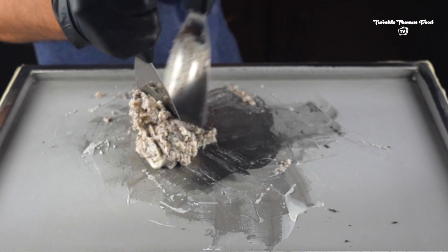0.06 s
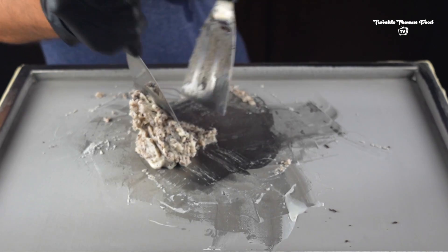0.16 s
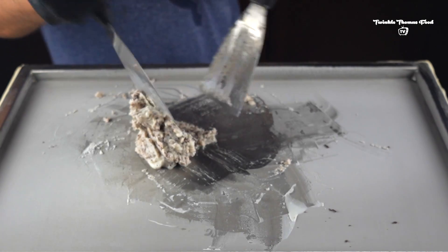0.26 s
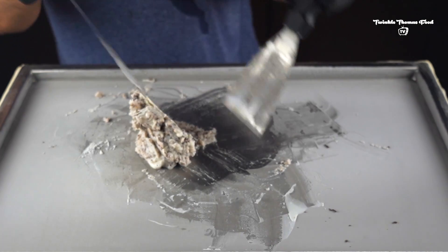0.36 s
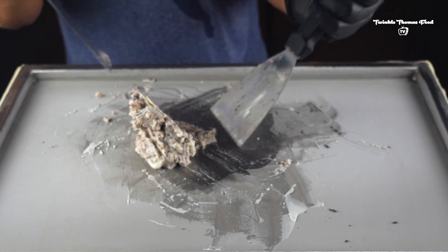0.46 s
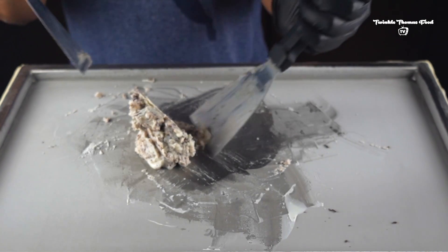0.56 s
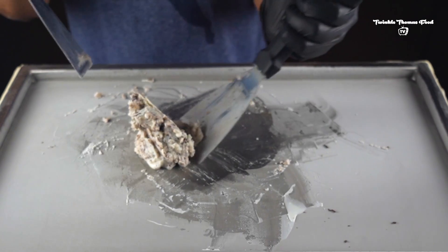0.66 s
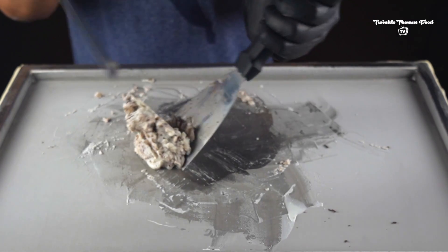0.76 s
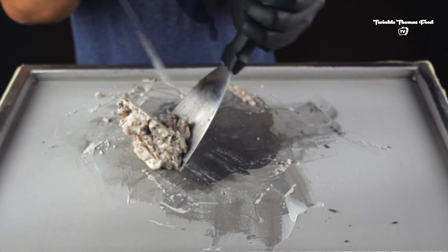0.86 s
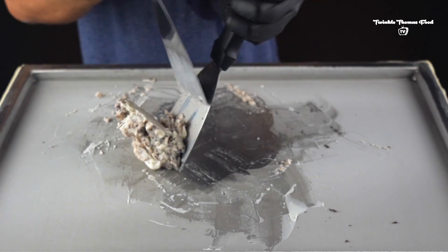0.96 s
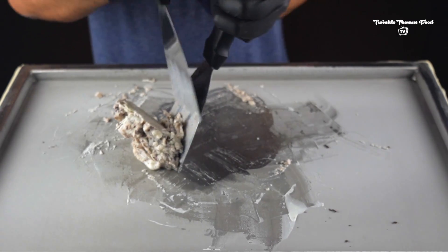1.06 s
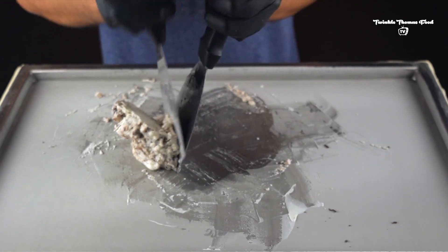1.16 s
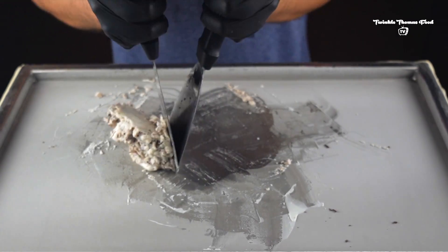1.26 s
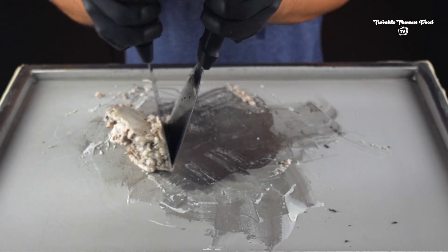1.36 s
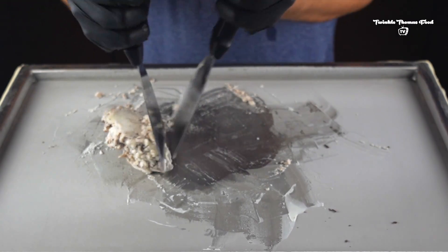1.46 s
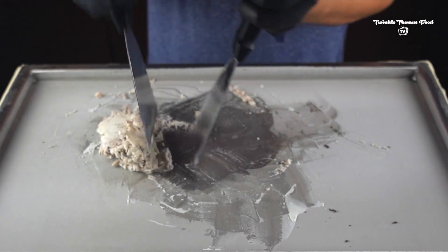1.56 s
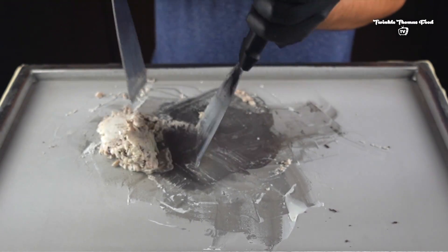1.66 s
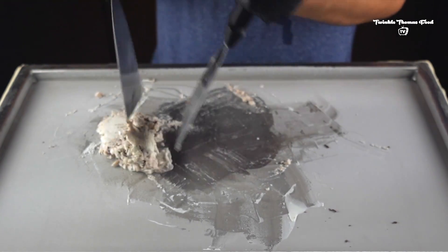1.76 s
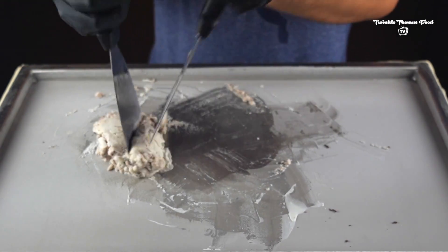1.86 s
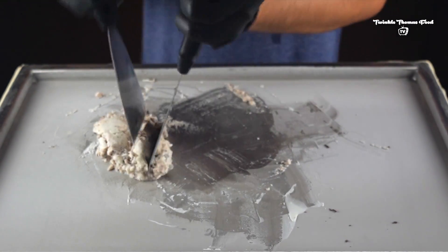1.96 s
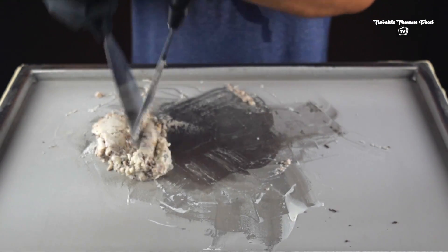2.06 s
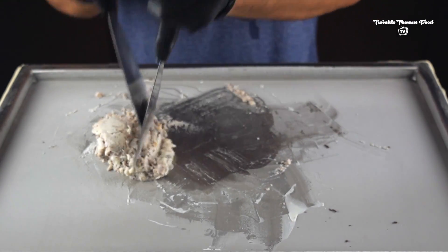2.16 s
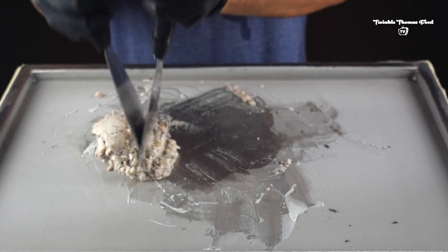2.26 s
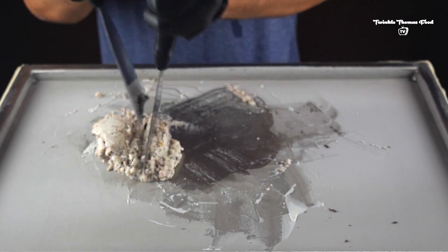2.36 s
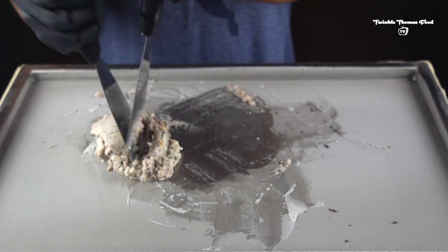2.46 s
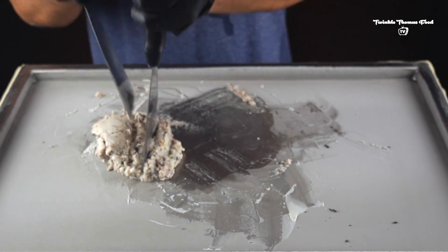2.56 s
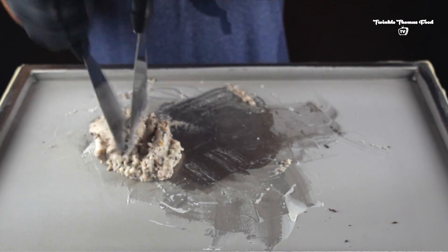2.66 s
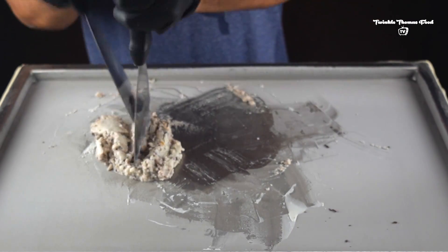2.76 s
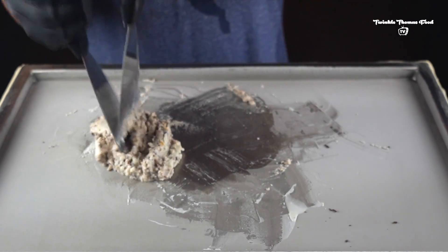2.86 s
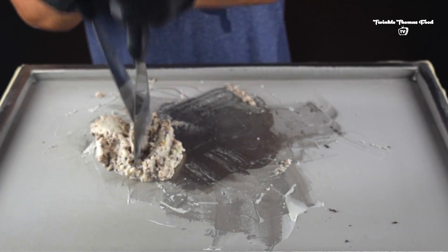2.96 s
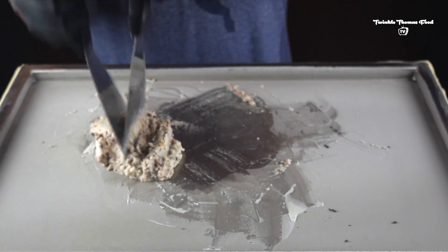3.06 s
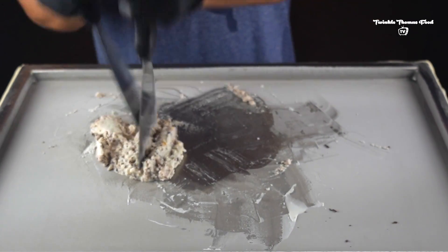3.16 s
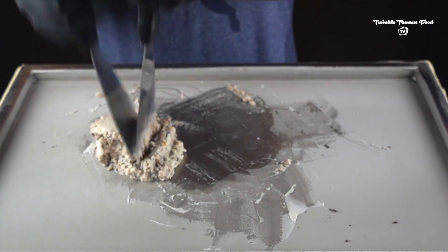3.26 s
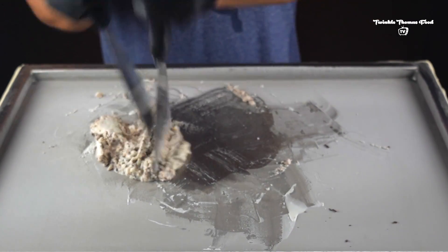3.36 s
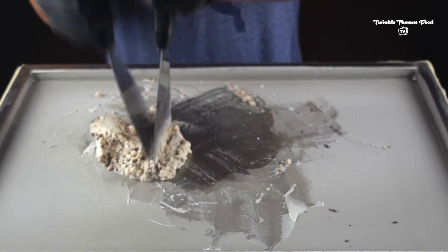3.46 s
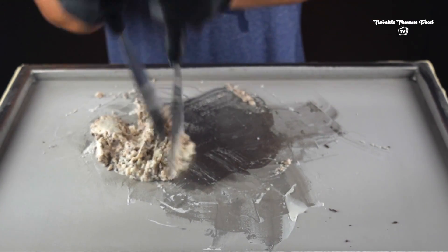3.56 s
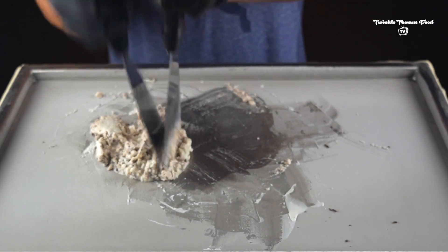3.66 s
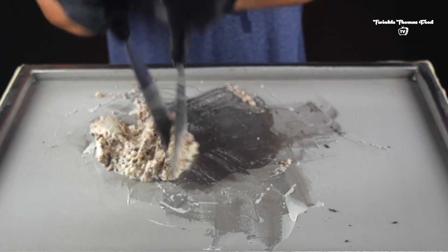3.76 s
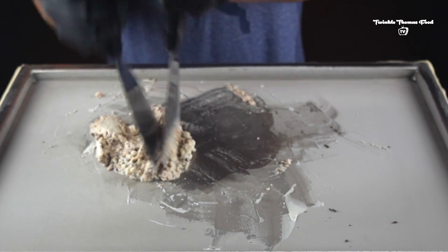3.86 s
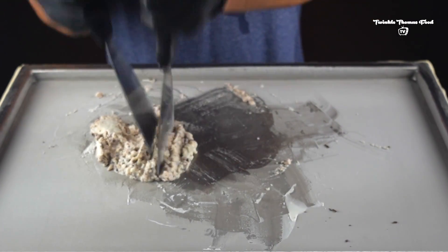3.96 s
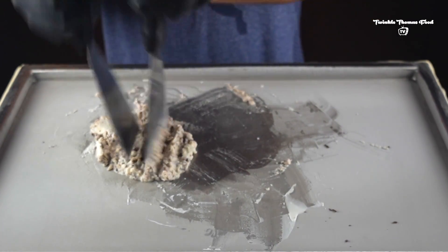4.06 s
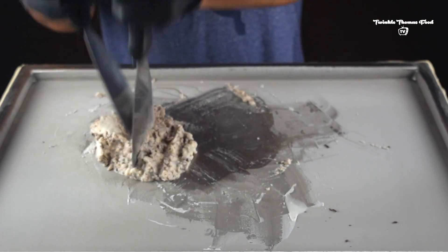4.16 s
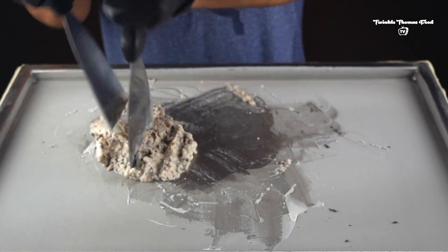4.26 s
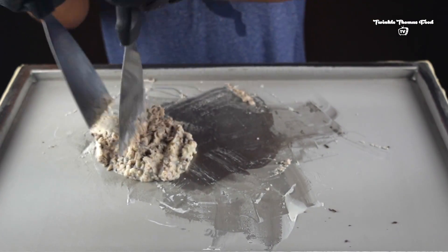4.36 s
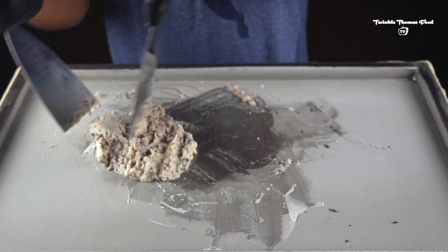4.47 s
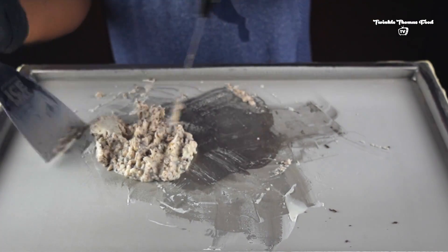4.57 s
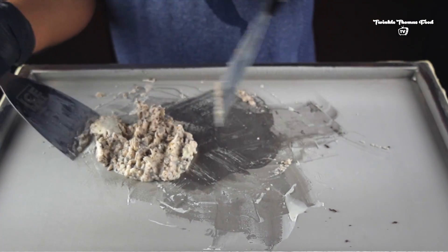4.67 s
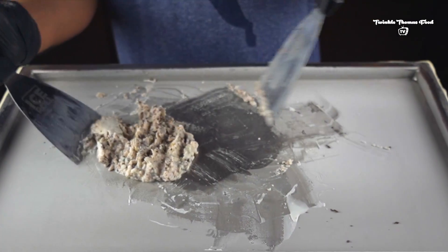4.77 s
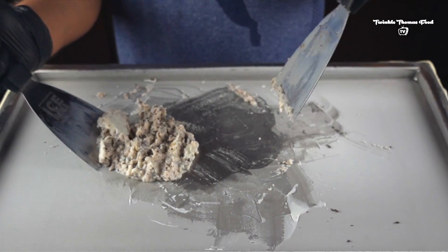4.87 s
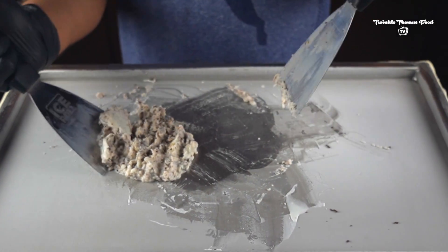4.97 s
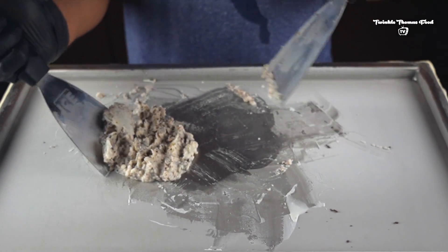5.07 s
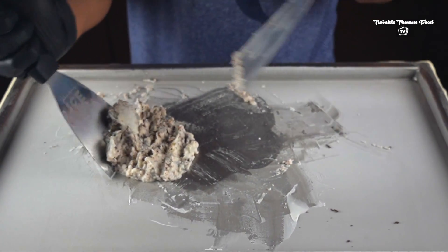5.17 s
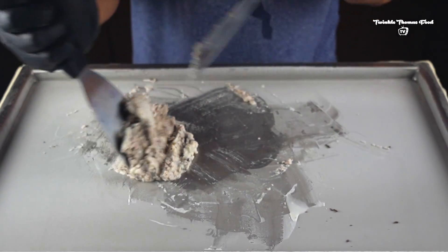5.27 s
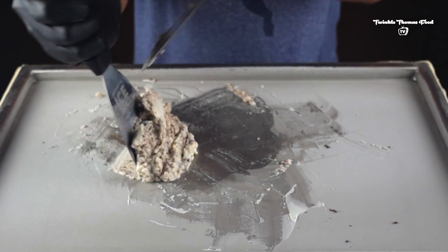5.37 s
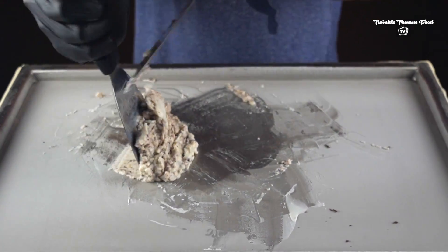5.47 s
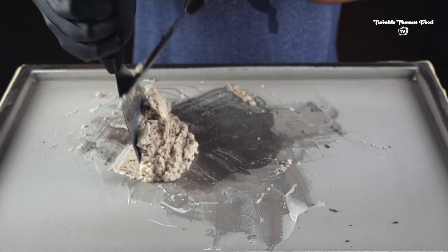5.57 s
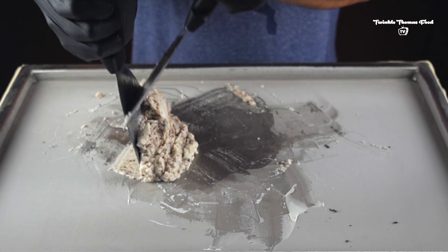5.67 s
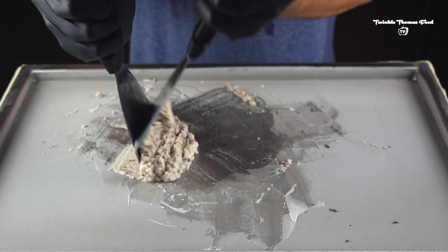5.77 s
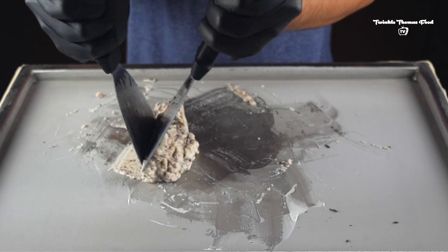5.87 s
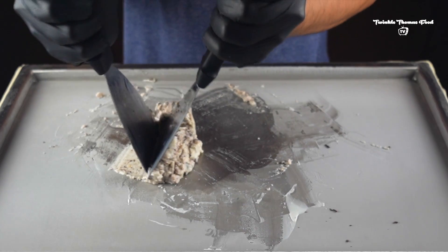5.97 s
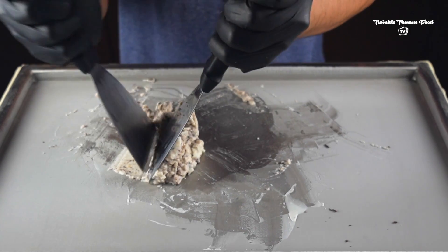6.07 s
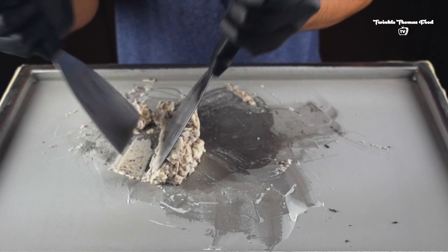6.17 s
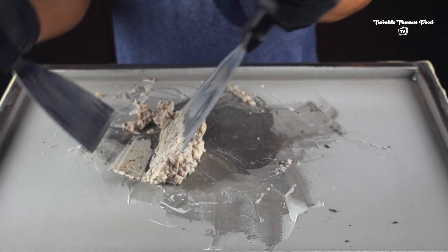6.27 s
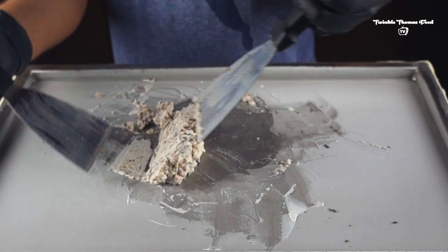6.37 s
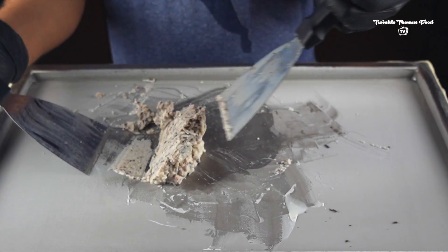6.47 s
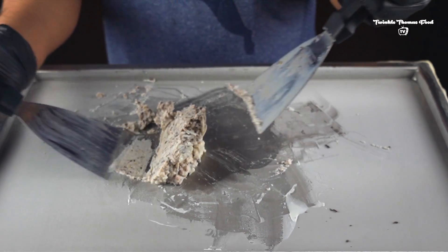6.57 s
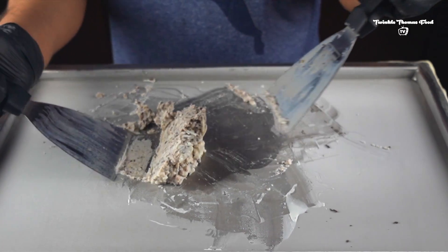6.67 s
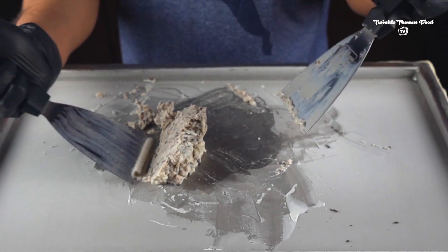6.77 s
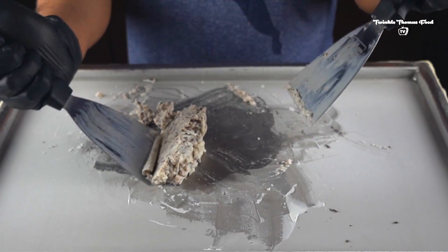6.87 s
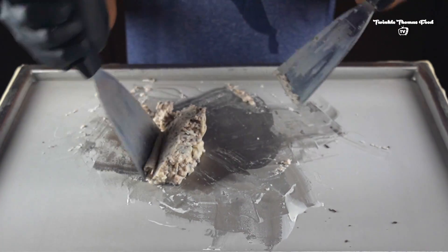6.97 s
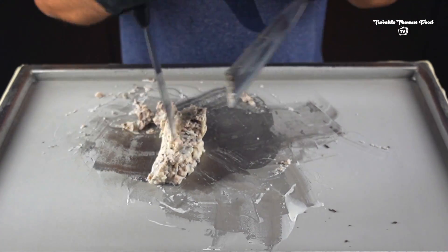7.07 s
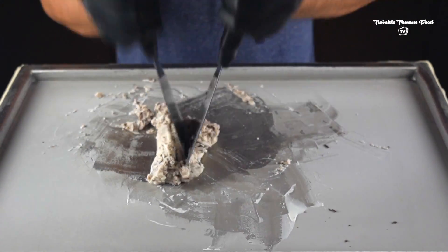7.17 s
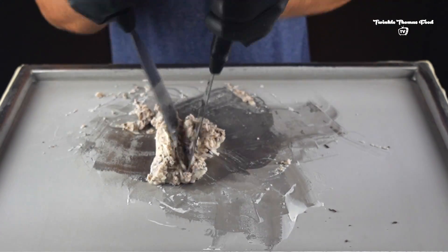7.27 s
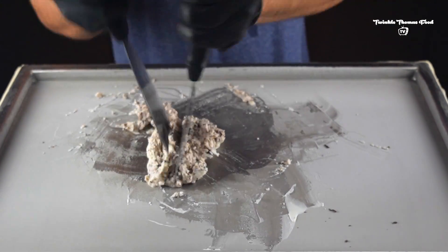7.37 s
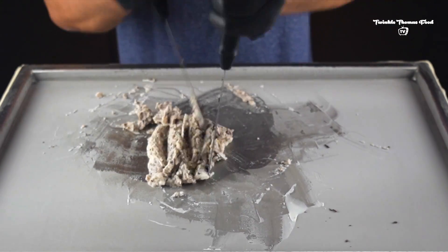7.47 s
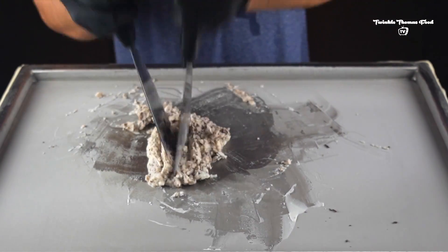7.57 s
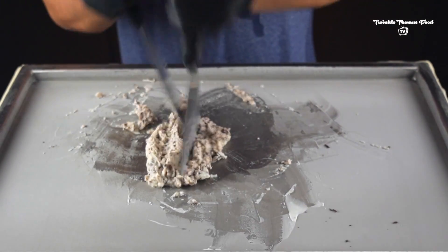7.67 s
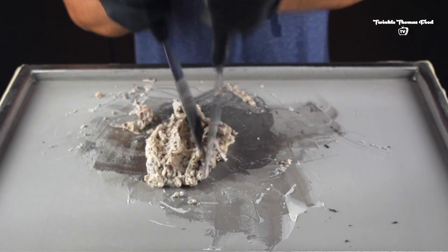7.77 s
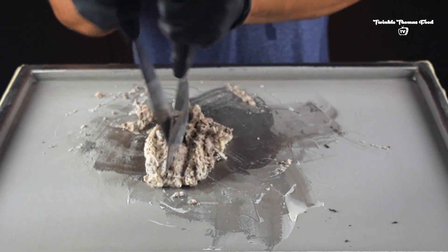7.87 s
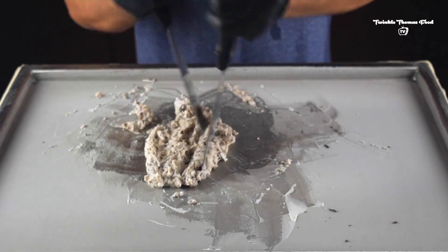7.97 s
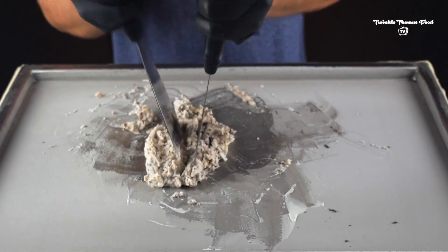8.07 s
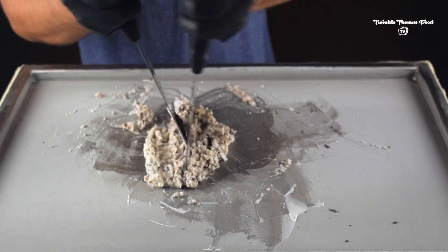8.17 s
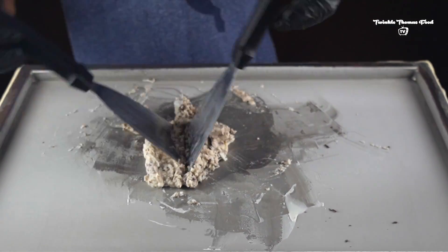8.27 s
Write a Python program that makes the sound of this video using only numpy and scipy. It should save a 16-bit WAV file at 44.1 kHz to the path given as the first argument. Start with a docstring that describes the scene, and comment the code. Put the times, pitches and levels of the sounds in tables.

```python
"""Two steel spatulas chop frozen cream on a refrigerated steel plate in a small hard kitchen.
Each chop is an impulse that excites resonances: crack, knock, blade ring, plate modes and a low thump.
Between chops the blades scuff each other (bursts of filtered noise), slide over the frost or ring on after
a tap (friction noise with a wavering squeal). Decaying octave bands of noise make the room; below it all
lies the chiller, as shaped noise for the air and narrow resonances for the drones."""
import sys
import numpy as np
from scipy import signal
from scipy.fft import rfft, irfft, next_fast_len
from scipy.io import wavfile
from scipy.ndimage import uniform_filter1d

SR = 44100
rng = np.random.default_rng(int(sys.argv[2]) if len(sys.argv) > 2 else 0)


def put_to_file(sound):
    """Save the sound as 16-bit audio at rate SR, in the file named by the first command-line argument."""
    columns = np.atleast_2d(sound).T  # one column per channel
    safe = np.clip(columns, -1, 1)
    whole_steps = np.round(safe * 32767)
    wavfile.write(sys.argv[1], SR, whole_steps.astype(np.int16))


N = 367339
MIRROR = np.array([[1], [-1]])  # opposite signs on left and right


def undb(db):
    """Decibel law: amplitude ratio of a level."""
    return 10 ** (np.asarray(db) / 20)


def unit(x):
    """Normalization to an RMS of one."""
    return x / np.sqrt(np.mean(x ** 2))


def curve(table, hz):
    """Interpolation of (Hz, value) points on a logarithmic frequency axis."""
    point_hz, value = np.transpose(table)
    return np.interp(np.log(np.maximum(hz, 1)), np.log(point_hz), value)


def resonate(x, peaks):
    """Parallel resonance: a sum of band-passes given as (Hz, width Hz, dB)."""
    out = 0
    for hz, width_hz, db in peaks:
        b, a = signal.iirpeak(hz, hz / width_hz, SR)
        out = out + undb(db) * signal.lfilter(b, a, x)
    return out


def band(x, lo_hz, hi_hz):
    """Band limitation by a Butterworth filter, its top edge kept below the Nyquist limit."""
    top_hz = min(hi_hz, .45 * SR)
    return signal.sosfilt(signal.butter(2, [lo_hz, top_hz], "band", fs=SR, output="sos"), x)


def walk(rate_hz):
    """Random modulation: normal levels drawn rate_hz times a second and joined by slopes."""
    hold = int(SR / rate_hz)
    steps = np.repeat(rng.standard_normal(N // hold + 1), hold)
    return uniform_filter1d(steps, hold)[:N]


def panned(x, left_minus_right_db):
    """Interaural level difference, split evenly between the two sides."""
    return x * undb(MIRROR * left_minus_right_db / 2)


def add(out, start_s, x):
    """Superposition of a sound onto the scene from its start time."""
    i = int(start_s * SR)
    out[:, i:i + x.shape[1]] += x[:, :N - i]


def ring(starts, gain, modes, scatter_db, detune=0, phase=0, rise_s=1 / SR):
    """Modal synthesis: struck decaying sines, weighted and optionally tuned anew at every blow."""
    hz, db, t60, late_s = np.transpose(modes)[:, :, None]
    t = np.maximum(np.arange(SR // 2) / SR - late_s, 0)
    attack = 1 - np.exp(-t / rise_s)
    closing = np.cos(np.linspace(0, np.pi / 2, SR // 2)) ** .5  # silent after half a second
    fade = undb(db - 60 * t / t60) * attack * closing
    turns = 2 * np.pi * hz * t
    sines = np.sin(turns + phase) * fade
    chance = rng.standard_normal((len(starts), 2, len(modes)))
    weights = gain * undb(scatter_db * chance[:, 0])
    shifts = chance[:, 1, :, None]
    out = np.zeros((1, N))
    for start_s, weight, shift in zip(starts, weights, shifts):
        tuned = np.sin(turns * (1 + detune * shift) + phase) * fade if detune else sines
        add(out, start_s, (weight @ tuned)[None])
    return out


# edge meets plate: start_s, crack_peak_db, thump_db, upper_ring_db, edge_brightness_db, upper_ring_hz,
# knock_db, then six levels, one per clank mode (db)
CHOP_EVENTS = [(0.3854, -35, -44, -23.5, -24.5, 3570, -39, -36.5, -51, -63, -68, -35, -54),
               (0.9265, -37, -62, -26, -23.5, 3760, -37.5, -56, -34.5, -47, -56, -46, -48),
               (0.9674, -64.0, -54, -43.0, -36.0, 3760, -73, -55, -60, -50, -65, -61, -68),
               (1.1245, -85, -54, -46, -43.0, 3350, -75, -63, -65, -71, -75, -64, -69),
               (1.173, -65, -48, -47, -43.0, 3370, -69, -65, -75, -64, -74, -67, -80),
               (1.2068, -25, -43, -24.5, -31, 2820, -26, -33, -26, -30, -30.5, -60, -36),
               (1.404, -62.0, -70, -40, -39.5, 3580, -67, -55, -59, -59, -62, -56, -59),
               (1.942, -39, -42.5, -39.5, -49.0, 3320, -38, -49, -49, -44, -56, -50, -70),
               (2.0039, -19.5, -37, -20, -27.5, 2800, -23, -30, -32, -29, -35, -43, -39),
               (2.22, -17.5, -34, -22.5, -24.5, 2750, -25, -33, -27.5, -30, -31, -49, -46),
               (2.255, -27.5, -40, -30, -29.0, 2750, -29.5, -38.5, -34, -49, -52, -61, -57),
               (2.451, -16.5, -33.5, -20.5, -25.5, 2750, -23.5, -34, -29, -39, -33, -39, -42),
               (2.539, -21, -39, -19, -28.5, 3230, -24.5, -37, -27, -35, -35, -37, -48),
               (2.6686, -18.5, -36, -21, -25, 3250, -22.5, -46, -30.5, -30, -41, -38, -42),
               (2.7596, -22, -38, -20.5, -30, 2780, -29, -31, -21, -39, -34, -44, -52),
               (2.8671, -18.5, -37, -19.5, -24.5, 3250, -25, -47, -32.5, -44, -41, -41, -55),
               (2.9737, -20, -40.5, -22.5, -25.5, 2700, -26.5, -29, -28, -40, -39, -50, -46),
               (3.075, -18.5, -35, -22, -24.5, 3350, -24, -40, -26, -31, -41, -39, -54),
               (3.1795, -35, -45, -37, -34.5, 3000, -32, -35, -39, -35, -57, -59, -55),
               (3.279, -19.5, -34, -23.5, -25, 3540, -24, -38, -28, -33, -46, -49, -44),
               (3.3793, -20.5, -51, -18.5, -25.5, 3120, -27, -40, -24, -43, -30, -33, -58),
               (3.4783, -20, -34, -26.5, -28.0, 3220, -25, -30.5, -39, -26, -51, -47, -38),
               (3.5778, -22, -44, -17, -29, 3240, -23, -29, -22, -44, -27, -33, -46),
               (3.6768, -18.5, -35, -20.5, -24, 3220, -22.5, -38, -32, -36, -42, -35, -39),
               (3.7772, -20, -37, -15.5, -27, 3230, -24, -32, -27, -43, -27, -35, -40),
               (3.8771, -19.5, -36.5, -22.5, -24.5, 3200, -25.5, -39, -29, -26, -53, -47, -51),
               (3.94, -39, -77, -56, -31, 3200, -53, -56, -47, -52, -54, -61, -63),
               (3.9742, -26, -50, -15.5, -27.0, 3270, -23.5, -33, -53, -39, -40, -23, -50),
               (4.0853, -19, -35, -24, -20.5, 3540, -24.5, -40, -32, -32, -53, -49, -44),
               (4.3369, -52, -50.5, -45.5, -42, 3110, -56, -55, -62, -47, -78, -66, -72),
               (4.5787, -43, -50, -42, -39.5, 3590, -40.5, -57, -58, -50, -52, -70, -73),
               (5.542, -48, -61, -36.5, -32, 3580, -53, -58, -61, -63, -51, -61, -54),
               (6.4339, -42, -71, -34, -43, 3700, -50, -47, -51, -47, -58, -50, -60),
               (7.2092, -20, -36, -28, -30.0, 2650, -24, -42, -29, -37, -36, -58, -67),
               (7.2157, -21, -39, -22, -27, 2810, -41, -40, -32, -37, -54, -55, -55),
               (7.3109, -21.5, -33.5, -21, -27.5, 3110, -25, -47, -29, -30, -38, -32, -60),
               (7.367, -29, -37, -27.5, -32, 3280, -34, -52, -39, -40, -46, -42, -54),
               (7.4081, -24.5, -46, -24, -28, 3170, -33, -44, -35, -40, -40, -32, -49),
               (7.48, -25.5, -36.5, -17.5, -35, 3160, -27.5, -29, -31, -42, -47, -34, -48),
               (7.536, -21, -40.5, -25, -25, 3540, -26, -43, -27, -28, -40, -45, -41),
               (7.5791, -23.0, -37, -19.5, -30.0, 3180, -25, -30, -30, -43, -40, -30, -56),
               (7.6129, -35, -40, -29, -37, 3080, -42, -40, -42, -39, -51, -49, -56),
               (7.674, -24, -45, -44, -24.5, 3120, -32, -52, -42, -40, -51, -40, -48),
               (7.7205, -24.5, -36.5, -18, -30, 3200, -27, -29, -27, -39, -31, -35, -38),
               (7.7641, -20.5, -38, -23, -23.5, 3350, -29.5, -49, -41, -22, -53, -43, -50),
               (7.8177, -23.5, -33.5, -22.5, -32, 3260, -26.5, -48, -37, -40, -42, -27, -55),
               (7.898, -23, -36, -21.5, -22.5, 3470, -25.5, -39, -35.5, -36, -42, -41, -45),
               (7.9426, -25, -40.5, -17.5, -28.5, 3170, -27, -27, -26, -40, -32, -26, -36),
               (7.9986, -20, -37.5, -28, -26, 3330, -29.5, -45, -29, -33, -33, -51, -40),
               (8.09, -27, -35, -25, -41, 3070, -31, -39, -26, -40, -51, -33, -60),
               (8.1381, -22, -41, -22.5, -23.5, 3270, -26.5, -30, -27, -30, -38, -32, -41),
               (8.1675, -22.5, -40, -19, -59, 3240, -26.5, -41, -31, -45, -39, -30, -39),
               (8.2327, -37, -45, -36, -37, 3280, -46, -49, -58, -59, -53, -51, -47),
               (8.2737, -25.5, -39, -32, -27.5, 3260, -31, -36, -38, -42, -52, -49, -50)]
# resonances of the rattling edge: centre_hz, width_hz, level_db
EDGE_RESONANCES = [(6680, 2900, 21), (10160, 2000, 15), (13140, 3300, 18), (16000, 1500, -22)]
# the blade's upper resonances; each chop favours those near its upper ring: centre_hz, width_hz, level_db
UPPER_RESONANCES = [(2700, 350, -2), (3110, 280, -1.5), (3311, 194, 0.5), (3613, 250, -1.5), (4320, 870, 2),
                    (5090, 440, 4)]
# modes of the plate, relative to the crack: pitch_hz, level_db, t60_s, arrival_s after the blow
PLATE_MODES = [(760, 4, 0.026, 0.023), (1080, -1.5, 0.37, 0.0027), (1235, -2, 0.45, .005),
               (1333, -2, .4, .008), (1410, 3.5, 0.5, 0.01), (1493, 7, 0.56, 0), (1580, 7.5, 0.73, .012),
               (1940, 15.5, 0.09, 0.025), (1800, -9, 0.23, .004), (2068, 1, 0.83, .004),
               (2185, -2, 0.39, 0.012), (3120, 1, 0.11, 0.0035), (3230, -5, .1, .004),
               (1883, 6, .07, 0.014), (1730, 4, .07, .045)]
# modes whose strength depends on where the edge lands:
# pitch_hz, level_db, t60_s, arrival_s after the blow, after_ring_db relative to the mode
CLANK_MODES = [(1336, 8.5, 0.015, 0.002, -30), (1646, -2.5, 0.039, 0.0004, -8),
               (1928, 1.5, 0.027, 0.00065, -20), (2722, 0.5, 0.037, 0.0024, -11),
               (3334, 6.5, 0.015, 0.002, -29), (4210, 8.5, 0.018, 0.0026, -13)]
CRACK_HZ, CRACK_HZ_PER_DB = 1828, 7.5  # the crack leans to the stronger of the two clank modes beside it
RATTLE, FOCUS = .06, .5  # rattle noise relative to the tick; share of the near sound sent to the room
RING_PAN_DB, CRACK_PAN_DB = 1, -2  # left minus right
DETUNE, LINGER_DETUNE = 0.0067, 0.011  # random spread of mode pitch from blow to blow, as a share
LINGER_TIMES = 3.5  # each clank mode has a weaker after-ring, longer by this factor
CLANK_RISE_S = 0.00027


def chops(contact_s=0.0032, plate_db=-32, clank_room_db=-4.5, apart_db=-3):
    """Impulse response: a tick excites the steel while the edge rattles; returns near and radiated sound."""
    near, far, t = np.zeros((2, N)), np.zeros((1, N)), np.arange(1024) / SR
    tick = 1. * (t == 0)
    landing = np.exp(-(t / contact_s) ** 2)
    # neighbouring bands alternate in sign so that they join without a notch
    spans = [(1, 1350, 2200), (-1, 400, 1350), (-1, 2300, 5200), (1, 5200, 17000)]
    broad = [sign * unit(band(tick, lo_hz, hi_hz)) for sign, lo_hz, hi_hz in spans]
    for row, noise in zip(CHOP_EVENTS, rng.standard_normal((len(CHOP_EVENTS), 3, 1024))):
        start_s, crack_db, _, upper_db, edge_db, upper_hz, knock_db = row[:7]
        lean_db = np.clip(row[9] - row[8], -10, 10)
        low = [(CRACK_HZ + CRACK_HZ_PER_DB * lean_db, 450, 0)]
        high = [(upper_hz, 600, 0)]
        force = tick + RATTLE * noise[0] * landing
        crack = resonate(resonate(force, low), low)
        knock = band(force, 584, 1197)
        upper = resonate(resonate(resonate(force, high), UPPER_RESONANCES), UPPER_RESONANCES)
        edge = band(resonate(noise[1] * landing, EDGE_RESONANCES), 5000, 17500)
        layers = [(crack, crack_db, CRACK_PAN_DB), (knock, knock_db, CRACK_PAN_DB),
                  (upper, upper_db, RING_PAN_DB), (edge, edge_db, RING_PAN_DB)]
        # the edge rattles along its length, so the two sides hear different grains
        apart = band(resonate(noise[2] * landing, EDGE_RESONANCES), 5000, 17500)
        add(near, start_s, undb(edge_db + apart_db) * apart / np.abs(apart).max() * MIRROR)
        for (part, peak_db, pan_db), wide in zip(layers, broad):
            part = undb(peak_db) * part / np.abs(part).max()
            add(near, start_s, panned(part, pan_db))
            add(far, start_s, (np.std(part) * wide + FOCUS * part)[None])

    starts, crack_db = np.transpose(CHOP_EVENTS)[:2]
    plate = ring(starts, undb(crack_db + plate_db)[:, None], PLATE_MODES, 2.0, DETUNE)
    strengths = undb(np.array(CHOP_EVENTS)[:, 7:])
    struck = [mode[:4] for mode in CLANK_MODES]
    linger = [(hz, db + after_db, t60 * LINGER_TIMES, late_s) for hz, db, t60, late_s, after_db in CLANK_MODES]
    clank = ring(starts, strengths, struck, 0, phase=np.pi / 2, rise_s=CLANK_RISE_S)
    clank = clank + ring(starts, strengths, linger, 2.1, LINGER_DETUNE)
    return near + plate + clank, far + plate + undb(clank_room_db) * clank


# low modes of plate and cabinet, relative to each thump: pitch_hz, level_db, t60_s, arrival_s after the blow
THUMP_MODES = [(159.9, -10, 1, 0.004), (181.2, -3, 1, 0.0035), (191.3, -2.5, 1, 0.0044),
               (220.7, -7, 1, 0.00553), (244.7, -16, 0.87, 0.0045), (262, -18, 0.52, 0.0045),
               (300.6, -16, 0.51, 0.00306), (329.5, -16, .3, .003), (362, -14.5, 0.47, 0.00313),
               (378.8, -9.5, 0.71, 0.00251), (422.6, -4.5, 0.29, 0.0017), (433, -12, .4, 0.0014),
               (543, -18, 1, 0.00342), (611, -24, 0.74, 0.00304), (641, -24.5, 0.36, 0.00345),
               (696, -22, 0.25, 0.00354)]


def thumps(thump_db=-2):
    """Beating of close modes: plate and cabinet boom at the same fixed pitches after every blow."""
    starts, _, low_db = np.transpose(CHOP_EVENTS)[:3]
    return ring(starts, undb(low_db + thump_db)[:, None], THUMP_MODES, 1.0)


# one blade glances along the other: start_s, level_db of the hiss above 9 kHz,
# length_s before the quick fade, lower_hiss_db relative to the hiss above
SCUFF_EVENTS = [(2.091, -20, 0.016, -2.5), (2.498, -25.5, 0.025, -4), (2.924, -21, 0.061, -3.5),
                (3.129, -26.5, 0.011, -3.5), (4.132, -28, 0.01, 2), (7.54, -31, 0.023, -9),
                (7.677, -24.5, 0.018, -8), (7.877, -38, 0.022, -6), (7.906, -30, 0.015, -15),
                (7.997, -49, 0.014, -9), (8.042, -36.5, 0.016, -0.5)]
# a glancing blade also rings lower: centre_hz, width_hz, level_db
GLANCE_RESONANCES = [(2430, 100, 8.5), (3570, 93, 9.5), (4010, 70, 13), (4990, 90, 6)]
SCUFF_PAN_DB = 2  # left minus right


def scuffs(bright, grit, tail_s=0.0039):
    """Dry friction: short bursts of steel-on-steel noise that rise within milliseconds and fade."""
    out = np.zeros((2, N))
    t = np.arange(4096) / SR
    for start_s, db, length_s, lower_db in SCUFF_EVENTS:
        onset = np.minimum(t / 0.0065, 1)
        fade = np.exp(-t / 0.011) * np.exp(-np.maximum(t - length_s, 0) / tail_s)
        i = int(start_s * SR)
        rough, steel = grit[i:i + 4096], bright[i:i + 4096]
        lower = band(steel, 1600, 12700) + resonate(rough, GLANCE_RESONANCES)
        rub = band(steel, 8940, SR / 2) + undb(lower_db) * lower
        add(out, start_s, panned(undb(db) * onset * fade * rub, SCUFF_PAN_DB))
    return out


# strokes of the pushed edge, and blade rings that fade after a tap: full_level_s, rise_s, hold_s, fall_s,
# level_db, plate_share_db, squeal_share_db, squeal_hz, left_minus_right_db, rasp_share_db,
# grit_centre_hz, grit_share_db
SLIDE_EVENTS = [(0.385, .004, 0.018, 0.14, -54.5, 2, 6.5, 3486, -14, -7, 5300, -11),
                (0.532, 0.15, 0.013, 0.22, -49.5, -5, -6, 3620, -4, -12, 7100, -11),
                (0.69, 0.14, .015, 0.2, -53.5, -4, -7, 3500, -2, -15, 7150, -10),
                (0.945, 0.011, 0.031, .12, -67, -8, -6, 3700, 3, -12, 5300, -9),
                (1.05, .15, .03, .1, -63, -10, -13, 3600, -4, -15, 5300, -9),
                (4.618, .03, 0.041, .04, -54.5, -20, -9, 3500, 9, -15, 5200, -9),
                (4.739, 0.042, .004, 0.056, -46, -0.5, -7, 3870, 6, -6, 6500, -8),
                (4.83, 0.052, 0.032, 0.097, -44, -3, -13, 3550, 6, -10, 5400, -10),
                (4.923, .08, 0.033, 0.11, -59.5, -2, -12, 3630, 1, -4, 5300, -8),
                (5.047, 0.093, .01, .06, -66, -8, -14, 3600, 8, -12, 5300, -6),
                (5.14, .02, .015, .03, -68, -12, -20, 3600, 4, -15, 6500, -3),
                (5.237, 0.04, 0.061, 0.07, -57, 4, -18, 3840, 3, 3, 6800, -4),
                (5.546, .006, 0.0042, 0.13, -62, -10, 2, 3570, 3, -12, 5300, -9),
                (5.768, 0.19, 0.017, 0.11, -65, -5, -7, 3560, 5, -12, 5300, -13),
                (6.434, 0.0039, 0.02, 0.13, -71.5, 3, 12, 3730, 8, 0, 5300, -6),
                (6.437, .01, 0.027, .12, -75, -9, 19, 1368, 4, -9, 2350, 4),
                (6.573, 0.065, 0.03, .08, -52, -3, -6, 3750, 6, -11, 6750, -13),
                (6.628, 0.068, 0.017, 0.036, -49.5, -4, -5, 4030, 7, -8, 6700, -8),
                (6.741, 0.045, 0.1, .08, -59, -1, -2.5, 3990, 7, -5, 6800, -8),
                (6.866, 0.039, 0.025, 0.035, -58.5, -1, 2.5, 3900, 9, -8, 3050, -2),
                (6.88, .02, .03, .03, -70, -6, 9, 5550, 8, -9, 6600, -3)]
SWELL_DB = 41.5  # each event swells and fades by this much over its rise and fall
SAG = 0.082  # the squeal's pitch drops by this share over a whole rise or fall away from full level
OVERTONE, OVERTONE_DB = 1.67, -12  # the squeal's upper partial: frequency ratio and relative level
SQUEAL_WIDTH_HZ = 200


def slides(bright, grit):
    """Friction and resonance: strokes over frost and rings after a tap, with murmur, rasp and thin squeal."""
    out = np.zeros((2, N))
    murmur = resonate(grit, [(1620, 150, 1.9), (1950, 300, 4.1)])
    dull = unit(band(grit, 1220, 2400) + undb(4.5) * band(grit, 2250, 5140) + murmur)
    rasp = unit(band(band(grit[::-1], 1450, 2320), 1450, 2320))
    # slow complex noise spreads the squeal's pure tone into a narrow band
    slow = signal.butter(2, SQUEAL_WIDTH_HZ / 2, fs=SR, output="sos")
    flutter = unit(signal.sosfilt(slow, grit)) + 1j * unit(signal.sosfilt(slow, grit[::-1]))
    catch = undb(0.8 * walk(60) + 2.0 * walk(300))
    for (full_s, rise_s, hold_s, fall_s, db, plate_db, squeal_db, squeal_hz,
         pan_db, rasp_db, grit_hz, grit_db) in SLIDE_EVENTS:
        first = max(int((full_s - 1.5 * rise_s) * SR), 0)
        i = np.arange(first, int((full_s + hold_s + 1.5 * fall_s) * SR))
        t = i / SR
        # 0 at full level, 1 a whole rise before it or a whole fall after it
        rising = np.maximum(full_s - t, 0) / max(rise_s, 1e-3)
        falling = np.maximum(t - full_s - hold_s, 0) / max(fall_s, 1e-3)
        off = rising + falling
        turn = 2j * np.pi * np.cumsum(squeal_hz * (1 - SAG * off)) / SR
        partial = undb(OVERTONE_DB) * flutter[-i] * np.exp(OVERTONE * turn)
        squeal = np.real(flutter[i] * np.exp(turn) + partial)
        grain = unit(resonate(grit[-i], [(grit_hz, 600, 0)]))
        scrape = bright[i] + undb(plate_db) * dull[i] + undb(rasp_db) * rasp[i] + undb(grit_db) * grain
        rub = catch[i] * scrape + undb(squeal_db) * squeal
        out[:, i] += panned(undb(db - SWELL_DB * off) * rub, pan_db)
    return out


# a pressed blade's resonances: centre_hz, width_hz, level_db
BLADE_RESONANCES = [(5290, 1000, 3.5), (6400, 400, 2), (7220, 300, 5.5), (9600, 1500, 3),
                    (11200, 1000, 0.5), (12540, 500, 2.5), (13500, 500, 4.5), (14400, 290, 5)]


def friction():
    """Source and filter: irregular friction noise, and the same noise brightened by the blade."""
    bursts_db = 2.0 * rng.exponential(1, N) + 1.1 * walk(110)
    grit = unit(rng.standard_normal(N) * undb(bursts_db))
    low_hiss = band(grit, 4300, 11000)
    high_hiss = band(np.roll(grit, SR), 11000, 17000)
    bright = unit(resonate(grit, BLADE_RESONANCES) + undb(-6.0) * low_hiss + undb(-12.0) * high_hiss)
    return grit, bright


# octave bands of the reverberation: centre_hz, level_db, t60_s, side_minus_mid_db
ROOM_BANDS = [(245, -9, 1, -48), (497, -13, 1, -11), (850, -9.5, 0.74, -5.5), (2430, -15.5, 0.72, -2),
              (4310, -13, 0.54, 1.5), (9200, -14.5, 0.51, 5), (13100, -12.5, 0.39, -4)]


def room(x, first_echo_s=0.0012):
    """Reverberation: dense octave-band decays whose bass is alike on both sides."""
    t, tail = np.arange(SR // 2) / SR, 0
    for hz, db, t60, side_db in ROOM_BANDS:
        lo_hz, hi_hz = hz / np.sqrt(2), hz * np.sqrt(2)
        mid, side = (unit(band(rng.standard_normal(len(t)), lo_hz, hi_hz)) for _ in range(2))
        onset = np.clip(t / first_echo_s, 0, 1) ** 2
        decay = undb(db - 60 * t / t60) * onset / np.sqrt(t60 * SR / 14)  # longer decays weigh no more
        tail = tail + decay * (mid + undb(side_db) * side * MIRROR)
    return signal.fftconvolve(x.mean(0)[None], tail, axes=1)[:, :N]


# spectrum of fan and kitchen air before scaling: frequency_hz, level_db per Hz
AIR_SPECTRUM = [(18, -70), (30, -60), (70, -53), (119, -13), (225, 2.5), (257, -6), (437, -10.5),
                (555, -12), (651, -9.5), (724, -13), (1080, -14.5), (1600, -17.5), (4390, -28), (8310, -44),
                (14100, -40), (17000, -40)]
# stereo spread of the air: frequency_hz, side_minus_mid_db
AIR_SPREAD = [(60, -15), (110, -22), (200, -38), (380, -10), (700, -7.5), (1290, -5), (2380, -1.5),
              (4400, 2.5), (8120, 7), (15000, -4)]
# the compressor's narrow drones: centre_hz, width_hz, level_db
DRONE_BANDS = [(56, 27, -78), (193, 17, -66), (332.4, 18, -64), (434, 6.6, -64.5), (527.7, 7, -63),
               (656.5, 15, -64), (3580, 28, -74), (3950, 28, -75), (4340, 19, -76), (12040, 150, -81),
               (14300, 200, -80)]
AIR_DB = -51  # mid level of the air, around which it wavers


def chiller():
    """Broadband and narrowband noise: wavering fan and kitchen air with the compressor's drones."""
    size = next_fast_len(N)
    hz = np.arange(size // 2 + 1) * SR / size
    mid, side = rfft(rng.standard_normal((2, size))) * undb(curve(AIR_SPECTRUM, hz))
    side = side * undb(curve(AIR_SPREAD, hz))
    pair = irfft(mid + side * MIRROR, size)[:, :N]
    air = pair / np.std(pair.mean(0)) * undb(AIR_DB + 0.55 * walk(2.37))
    drone = 0
    for centre_hz, width_hz, db in DRONE_BANDS:
        drone = drone + undb(db) * unit(resonate(rng.standard_normal(N), [(centre_hz, width_hz, 0)]))
    return air + drone


HUSH_S, HUSH_DB = 8.284, -9  # start and depth of the final drop in the steel's level
RIGHT_LAG = 2  # samples


def scene():
    """Superposition of struck steel, friction and room over the chiller."""
    grit, bright = friction()
    near, far = chops()
    rubs = scuffs(bright, grit) + slides(bright, grit)
    steel = near + rubs + room(far + undb(-3.0) * rubs) + thumps()
    # high-pass: the struck steel has little deep bass
    steel = signal.sosfilt(signal.butter(6, 138, "high", fs=SR, output="sos"), steel)
    # all ringing drops at once just after the last chop
    steel *= undb(HUSH_DB * np.clip((np.arange(N) / SR - HUSH_S) / 0.0021, 0, 1))
    # below the treble the right side is delayed by a few samples
    body = signal.sosfiltfilt(signal.butter(2, 6000, fs=SR, output="sos"), steel[1])
    steel[1] += np.roll(body, RIGHT_LAG) - body
    return steel + chiller()


SHELF_HZ, TOP_HZ = 17100, 17900


def record(dry):
    """Low-pass filtering: the top falls in a 25 dB step, then ends."""
    below = signal.sosfilt(signal.cheby2(8, 25, SHELF_HZ, fs=SR, output="sos"), dry)
    return signal.sosfilt(signal.ellip(8, .2, 70, TOP_HZ, fs=SR, output="sos"), below)


dry = scene()
out = record(dry)
put_to_file(out)
```